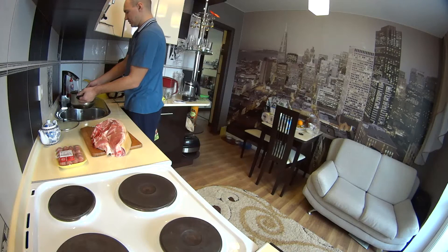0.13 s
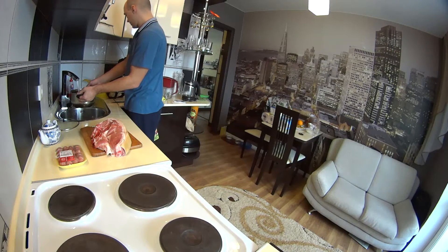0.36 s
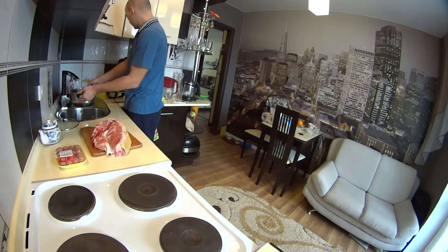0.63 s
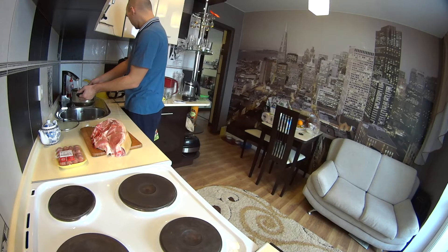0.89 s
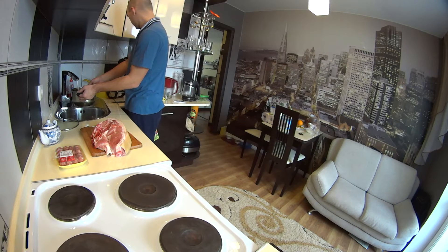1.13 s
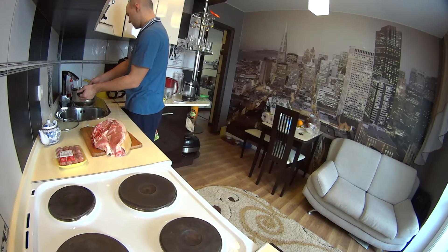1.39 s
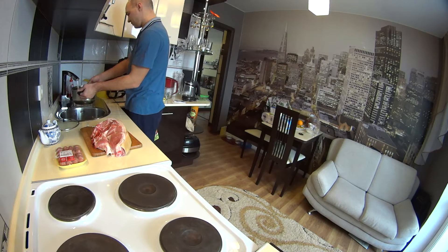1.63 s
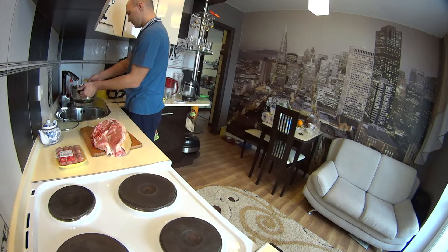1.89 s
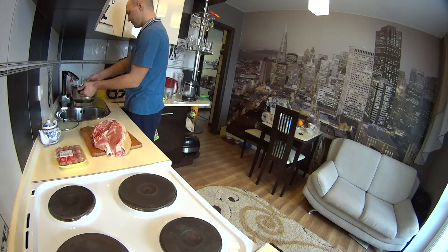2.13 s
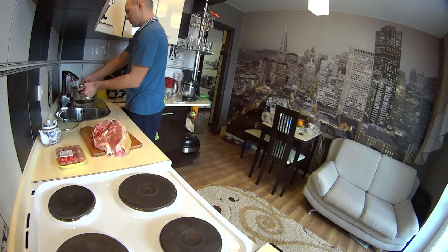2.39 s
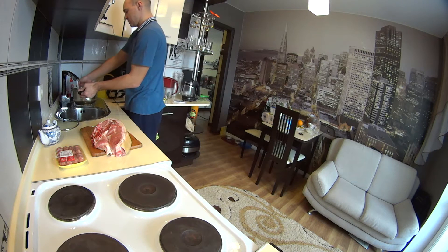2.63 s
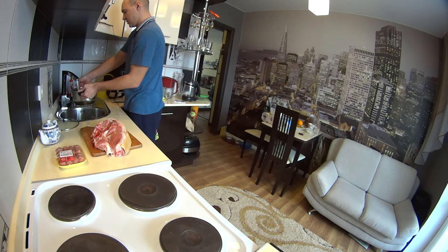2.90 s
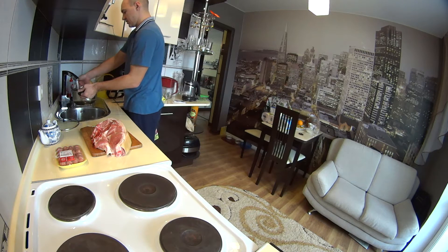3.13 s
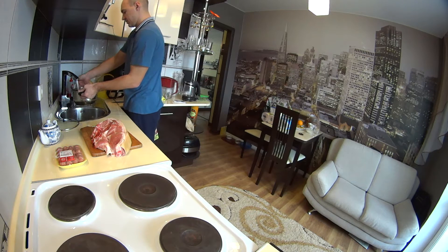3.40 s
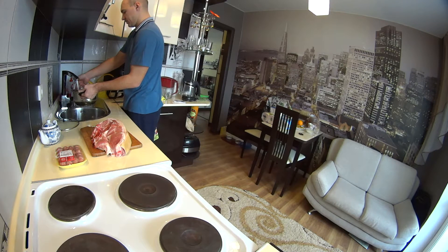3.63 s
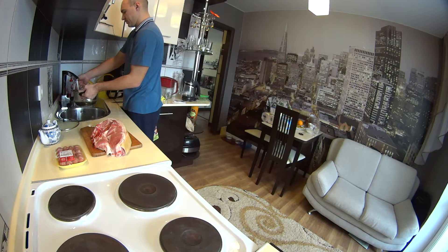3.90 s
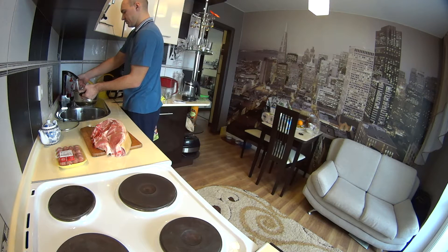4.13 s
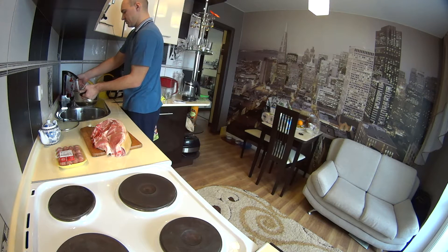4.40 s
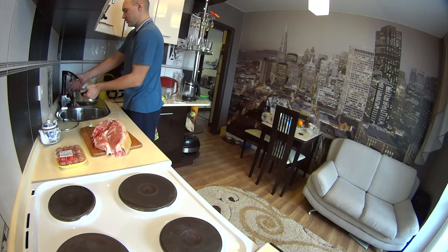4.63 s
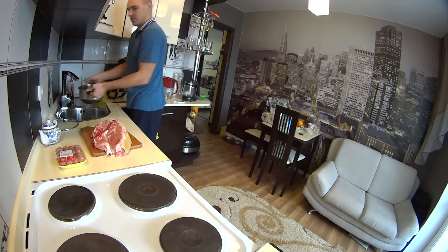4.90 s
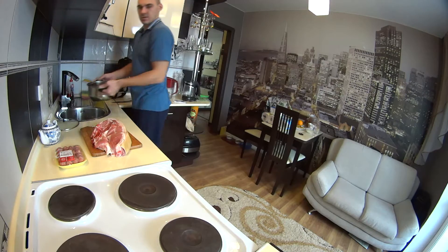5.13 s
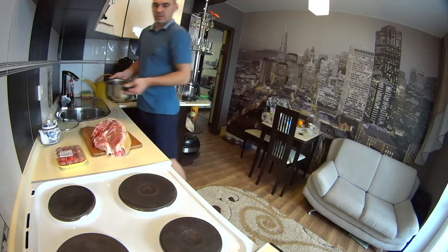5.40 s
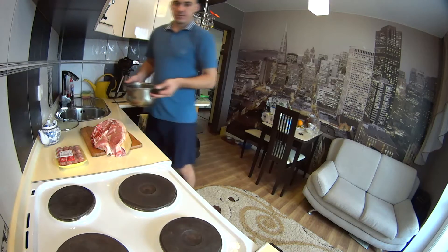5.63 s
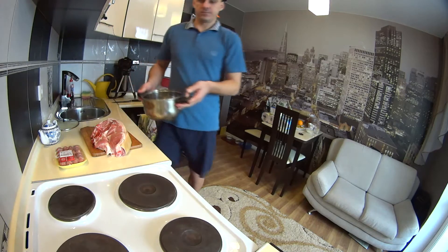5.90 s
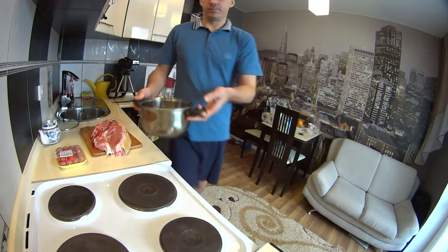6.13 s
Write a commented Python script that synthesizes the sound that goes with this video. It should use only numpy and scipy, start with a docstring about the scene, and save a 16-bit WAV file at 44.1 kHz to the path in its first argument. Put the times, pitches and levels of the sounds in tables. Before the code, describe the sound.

Loud water drumming into a metal pot, abruptly cut off with a dull knock, followed by trickles, ticking drips, faint footsteps and a tiny squeak.

```python
"""A hard jet of tap water fills a steel pot over the sink: random drop impacts make a hiss coloured by the air
left in the pot, and splashing drives resonances of its walls and bottom, which change as it fills.
The tap shuts with a water-hammer thud of damped pipe modes; the last water trickles as clumped, filtered grains
and drips as ticks with rising tones, then a swish, a rustle and a short squeak. Soft scuffs of gritty noise and
faint tones go with the carrying of the pot. Two close microphones a few metres away hear it in a furnished room."""
import sys
import numpy as np
from scipy import signal
from scipy.fft import rfft, irfft, next_fast_len
from scipy.io import wavfile

SR = 44100
rng = np.random.default_rng(int(sys.argv[2]) if len(sys.argv) > 2 else 0)


def unload_wav(signal):
    """Save mono or channel-first audio to the path in sys.argv[1] as 16-bit WAV at rate SR, clipped to [-1, 1]."""
    wavfile.write(
        sys.argv[1],
        SR,
        np.round(np.clip(np.atleast_2d(signal).T, -1, 1) * 32767).astype(np.int16),
    )


def decibels_to_gain(level_db):
    """Convert a level in decibels to a linear amplitude gain (20 dB per decade)."""
    exponent = np.asarray(level_db, float) / 20
    return 10 ** exponent


N = 276066   # length in samples


def rms_one(x):
    """Normalization: scale to an rms of 1."""
    return x / np.sqrt(np.mean(x ** 2) + 1e-20)


def in_time(rows):
    """Linear interpolation: columns of a table become per-sample curves."""
    s, *columns = np.transpose(rows)
    return [np.interp(np.arange(N) / SR, s, c) for c in columns]


def at_hz(points, hz):
    """Spectral interpolation: levels are read along a log-frequency axis."""
    table_hz, table_db = np.transpose(points)
    return np.interp(np.log(hz), np.log(table_hz), table_db)


def coloured(x, points):
    """Linear filtering: multiply the spectrum of a long sound by a gain curve."""
    size = next_fast_len(N)
    hz = np.maximum(np.arange(size // 2 + 1) * SR / size, 1)
    return irfft(rfft(x, size) * decibels_to_gain(at_hz(points, hz)), size)[:N]


def drift(rate):
    """Low-passed noise: a slow random curve of rms 1 that changes about rate times a second."""
    r = np.exp(-80 * np.pi * rate / SR)   # one step per 40 samples
    noise = rng.standard_normal(N // 40 + 2002)
    slow = signal.lfilter([1], [1, -2 * r, r * r], noise)[2000:]   # drop the filter's start
    return np.interp(np.arange(N) / 40, np.arange(len(slow)), rms_one(slow))


def resonance(x, hz, width_hz):
    """Driven resonator: a two-pole peak whose damping sets its width."""
    r = np.exp(-np.pi * width_hz / SR)
    return signal.lfilter([1, 0, -1], [1, -2 * r * np.cos(2 * np.pi * hz / SR), r * r], x)


def ring(clicks, hz, t60):
    """Impulse response of a damped mode: a unit click starts a dying sine of height 1."""
    r, w = decibels_to_gain(-60 / (max(t60, .0003) * SR)), 2 * np.pi * hz / SR
    return signal.lfilter([0, np.sin(w)], [1, -2 * r * np.cos(w), r * r], clicks + 1e-18)


def droplets(per_s, spread_db):
    """Random point process: impacts of uneven size and either sign, rms 1."""
    sizes = decibels_to_gain(spread_db * np.minimum(rng.exponential(1, N), 5)) * rng.choice([-1, 1], N)
    return rms_one(sizes * (rng.random(N) < per_s / SR))


def patchy(x, patchy_db):
    """Random band modulation: overlapping quarter-octaves swell and sink, partly together."""
    size = next_fast_len(N)
    spectrum, together, out = rfft(x, size), drift(8.0), 0
    hz = np.arange(1, size // 2 + 2) * SR / size
    step = np.maximum(4 * np.log2(hz / 100), 0)   # quarter-octaves above 100 Hz
    for k in range(31):
        # triangular bands add up flat
        band = irfft(spectrum * np.clip(1 - abs(step - k), 0, 1), size)[:N]
        out = out + band * decibels_to_gain(patchy_db * (0.51 * together + 1.26 * drift(2.75) + 0.24 * drift(26.0)))
    return out


def swells(s, db, rise_s, fall_s):
    """Envelope superposition: a sum of lopsided bell curves."""
    t = np.arange(N) / SR
    return sum(decibels_to_gain(d) * np.exp(-((t - at) / np.where(t < at, rise, fall)) ** 2)
               for at, d, rise, fall in np.broadcast(s, db, rise_s, fall_s))


def reflections(x, t60):
    """Diffuse reverberation: dense, exponentially dying echoes of unit energy."""
    t = np.arange(round(t60 * SR)) / SR
    tail = rng.standard_normal(len(t)) * decibels_to_gain(-60 * t / t60) * (t > .003)
    return signal.fftconvolve(x, tail / np.sqrt(np.sum(tail ** 2)))[:N]


def valve_closing_db():
    """Flow throttling: the valve closes ever faster, so the level falls with the cube of time."""
    closing_s, db_per_s3 = 4.43, 13000
    return -db_per_s3 * np.clip(np.arange(N) / SR - closing_s, 0, 1) ** 3


def spray_and_rumble(fill, running):
    """Cavity colouration: drop impacts hiss through the air space left in the pot, over churning water."""
    # Hiss spectra of the empty, half-full and full pot: [f/Hz, level/dB per Hz]
    hiss_empty = [(880, -29), (1500, -17), (2040, -23), (2420, -6.5), (2730, -5.5), (3070, -10.5),
                  (3430, -10), (3680, -6), (4270, -6), (5320, -3), (6960, -1), (9020, -7.5), (11600, -19.5),
                  (15100, -22), (16200, -44)]
    hiss_half = [(880, -52), (1500, -15.5), (1870, -15), (2020, -9.5), (2130, -13.5), (2620, -9),
                 (2900, -7), (3570, -3.5), (4270, -3.5), (5060, -1), (7030, 1.5), (8240, -2),
                 (12200, -18.5), (15100, -18.5), (16200, -40)]
    hiss_full = [(880, -67), (1500, -9), (1660, -13), (1790, -14.5), (2700, -9), (3070, -0.5), (3980, -2.5),
                 (5370, 1.5), (5990, 1.5), (8240, 1), (9760, -8), (10600, -10), (12300, -21), (15100, -14),
                 (16200, -46)]
    # Spectrum of the churning water: [f/Hz, level/dB per Hz]
    rumble_colour = [(24, -43), (40, -14), (168, -7.5), (254, 3.5), (312, -16), (396, -10.5), (563, -8),
                     (893, -6), (1350, -2.5), (1800, -17), (2340, -22.5), (3960, -120)]
    flow_db, rumble_db = -18.5, -39
    hiss = 0
    for k, colour in enumerate((hiss_empty, hiss_half, hiss_full)):
        spray = coloured(droplets(20000, spread_db=2.5), colour)
        spray = spray + decibels_to_gain(-9) * reflections(spray, .06)   # tiles and sink add fine ripples to the colour
        share = np.sqrt(np.clip(1 - abs(2 * fill - k), 0, 1))   # equal-power crossfade
        hiss = hiss + share * rms_one(spray)
    churn = rms_one(coloured(droplets(4000, spread_db=3.5), rumble_colour))
    rumble = decibels_to_gain(rumble_db + 0.77 * fill) * running * churn
    return patchy(decibels_to_gain(flow_db) * running * hiss + rumble, patchy_db=0.5)


def further_pot_modes(fill, running):
    """Forced vibration: noise shakes further pot modes, whose levels shift as the pot fills."""
    # Further pot modes, one low and the rest above the main ring:
    # [f/Hz, width/Hz, level when empty/dB, level when full/dB]
    pot_modes = [(814, 22, -48, -46.5), (1325, 11, -51.5, -45), (1430, 150, -45, -67),
                 (1674, 13, -53, -46.5), (1856, 20, -45, -49), (2160, 28, -45, -44),
                 (342.6, 18, -49.5, -52), (2390, 16, -43.5, -47), (2967, 58, -48, -46),
                 (3200, 59, -77, -45)]
    out = np.zeros(N)
    for hz, width_hz, empty_db, full_db in pot_modes:
        shaken = rms_one(resonance(rng.standard_normal(N), hz, width_hz))
        out += running * decibels_to_gain((1 - fill) * empty_db + fill * full_db + 1.7 * drift(6.2)) * shaken
    return out


def mode_flares(running):
    """Passing resonance: high wall modes flare while the water level suits them."""
    # Flares: [t of the peak/s, f/Hz, level/dB, half length/s]
    flares = [(.1, 7270, -30, 0.24), (.15, 8000, -30, .3), (.2, 6700, -38, 0.46), (0.48, 3720, -30.5, 0.36),
              (.7, 5230, -28, 0.52), (.8, 5730, -29, .45), (1.248, 7050, -36, 0.32), (2.1, 7070, -29, .4),
              (2.398, 6680, -28.5, 0.27), (3.2, 8300, -32.5, 1.1), (3.3, 5290, -32.5, 0.99),
              (3.9, 7120, -32, 0.43), (1.5, 10750, -45, 2.4)]
    out = np.zeros(N)
    for at, hz, db, half_s in flares:
        mode = rms_one(resonance(rng.standard_normal(N), hz, width_hz=81))
        out += running * swells(at, db, half_s, half_s) * mode
    return out


def slapped_steel(running):
    """Impact excitation: lumps of the stream slap the main modes; water load raises hum and damps ring."""
    # Modes of pot bottom and sink: [f/Hz, width/Hz, level/dB]
    hum_modes = [(265.8, 6.4, 1), (255.3, 6.5, -4), (196.7, 7, -11), (143, 13, -11.5)]
    # Wall modes of the main ring: [f/Hz, width/Hz, level/dB]
    ring_modes = [(588, 28.6, 4), (550, 27, -1), (515.5, 11, -10), (635, 35, 0), (662, 150, -7)]
    # Heavy lumps hitting the steel: [t/s, hum level/dB, ring level/dB, length/s]
    lumps = [(0.22, -45, -48, 0.081), (0.431, -40, -31.5, 0.023), (1.135, -55, -39, 0.048),
             (1.373, -45, -48, 0.054), (1.744, -36, -61, 0.036), (2.555, -39, -37, .09),
             (2.79, -44, -36, .04), (2.895, -34.5, -59, 0.033), (3.022, -41, -34.5, .05),
             (3.195, -40, -46, 0.11), (3.512, -35, -42, 0.051), (3.683, -43.5, -42, 0.062),
             (3.82, -32.5, -59, 0.051), (4.133, -43, -74, 0.2), (4.476, -45, -45, 0.064)]
    rise_share = 0.27   # part of a lump's length
    t = np.arange(N) / SR
    s, hum_slap_db, ring_slap_db, length_s = np.transpose(lumps)
    undamped = np.exp(-(t / 1.7) ** 2)
    hum_db = -49.5 + 0.5 * t
    ring_db = undamped * -35 + (1 - undamped) * -44.5
    out = np.zeros(N)
    for modes, steady_db, slap_db in ((hum_modes, hum_db, hum_slap_db), (ring_modes, ring_db, ring_slap_db)):
        slaps = droplets(3000, spread_db=2.0)
        body = 0
        for hz, width_hz, db in modes:
            mode = resonance(resonance(slaps, hz, 3 * width_hz), hz, width_hz)
            body = body + decibels_to_gain(db) * rms_one(mode)
        lump_level = swells(s, slap_db, rise_share * length_s, (1 - rise_share) * length_s)
        out += (running * decibels_to_gain(steady_db) + lump_level) * rms_one(body)
    return out


def jet():
    """Superposition: spray, rumble and steel modes stop together as the tap shuts."""
    # How full the pot sounds: [t/s, fill 0-1]
    fill_curve = [(0, 0), (1.1, .08), (1.6, .5), (2.5, .55), (2.8, 1), (4.62, 1)]
    shut_s, shut_fade_s = 4.62, .056
    fill, = in_time(fill_curve)
    running = decibels_to_gain(valve_closing_db())
    out = spray_and_rumble(fill, running) + further_pot_modes(fill, running)
    out += mode_flares(running) + slapped_steel(running)
    return out * np.clip((shut_s - np.arange(N) / SR) / shut_fade_s, 0, 1)


def room_noise():
    """Stationary random noise: a steady coloured background."""
    # Spectrum of the background: [f/Hz, level/dB per Hz]
    floor_colour = [(15, -36), (25, -13), (53, 2.5), (97, -6), (149, 0.5), (294, -5.5), (396, -1.5),
                    (466, -0.5), (781, -9), (944, -8), (2070, -17), (6820, -14.5), (11700, -23.5),
                    (15000, -23), (16200, -32)]
    return decibels_to_gain(-46) * rms_one(coloured(rng.standard_normal(N), floor_colour))


def run_off():
    """Modulated noise: a thinning trickle, splashes, a swish, a rustle and a wavering drain whistle."""
    # Spectrum of the trickle: [f/Hz, level/dB per Hz]
    trickle_colour = [(120, -26), (200, -4), (569, -3.5), (735, -4.5), (821, -7), (2210, -10.5), (3130, -9),
                      (4770, -6.5), (7970, -9), (16000, -41)]
    # Splashes into the sink; the last two are a soft swish and a rustle: [t/s, level/dB, length/s]
    bursts = [(4.613, -56, 0.032), (4.655, -58, 0.017), (4.806, -41.5, 0.11), (4.88, -47, 0.09),
              (4.957, -39.5, 0.13), (5.106, -47, 0.098), (5.212, -47.5, 0.054), (5.273, -51, 0.055),
              (5.96, -52, 0.21), (6.115, -55, .065)]
    # Course of the drain whistle: [t/s, level/dB]
    whistle_course = [(4.5, -50), (4.62, -64), (5.0, -63), (5.08, -52), (5.25, -55), (5.47, -54),
                      (5.58, -66), (5.75, -75)]
    start_s, fade_in_s, burst_rise_share = 4.5, 0.041, 0.17
    t = np.arange(N) / SR
    since = t - start_s
    s, db, length_s = np.transpose(bursts)
    gush = decibels_to_gain(-28.5 - 114 * abs(since))   # the water left in the spout falls first
    steady = decibels_to_gain(-38.5 - 24 * abs(since))
    burst = swells(s, db, burst_rise_share * length_s, (1 - burst_rise_share) * length_s)
    grains = droplets(9000, spread_db=2.0) * decibels_to_gain(1.5 * drift(60.0))   # grains come in clumps
    trickle = patchy(rms_one(coloured(grains, trickle_colour)), patchy_db=-1.0)
    whistle_db, = in_time(whistle_course)
    whistle = rms_one(resonance(resonance(rng.standard_normal(N), 3260, 400), 3280, 220))
    whistle = np.interp(t + .0002 * drift(6.0), t, whistle)   # a time wobble in s bends the pitch
    out = (gush + steady + burst) * trickle + decibels_to_gain(whistle_db) * whistle
    return np.clip(since / fade_in_s, 0, 1) * out


def water_hammer():
    """Water hammer: the stopped column rebounds, each knock a soft blow that rings the pipe modes."""
    # Knocks: [t/s, blow level/dB, contact/ms]
    knocks = [(4.53, -31, 8), (4.548, -16.5, 2), (4.559, -20, 7), (4.5695, -21, 7), (4.6195, -26, 6),
              (4.643, -29, 6), (4.684, -25, 7), (4.744, -30, 6), (4.769, -30, 5), (4.857, -31, 4),
              (4.953, -32, 5), (5.048, -35, 6)]
    # Pipe modes: [f/Hz, level/dB, t60/s]
    pipes = [(85, 0, .15), (62, -13, .1), (38, -4, .09), (102, -6, .1), (148, -9, .1), (268, -4, .07),
             (325, -7, .06), (388, -11, .09), (600, -13, .04)]
    shudder_db, shudder_t60_s = -58, 1.3   # the loose pipes keep rattling on their clips
    since = np.arange(N) / SR - knocks[1][0]   # from the second knock
    dying = decibels_to_gain(shudder_db - 60 * np.maximum(since, 0) / shudder_t60_s) * (since > 0)
    rattle = dying * droplets(120, spread_db=0.0)
    contact = np.hanning(round(.003 * SR))
    blows = np.convolve(rattle, contact / contact.sum())[:N]
    for s, db, contact_ms in knocks:
        contact = np.hanning(round(max(contact_ms, 1) * SR / 1000))
        blows[round(s * SR):][:len(contact)] += decibels_to_gain(db) * contact / contact.sum()
    rings = sum(decibels_to_gain(db) * ring(blows, hz, t60) for hz, db, t60 in pipes)
    # the deepest part is not radiated
    return signal.sosfilt(signal.butter(2, 26, "high", fs=SR, output="sos"), rings)


def drips_and_squeak():
    """Damped chirps: each drip, and each part of a late squeak, is a tick, a rising tone and a spatter."""
    # Drips; the last three rows make one short squeak rising in pitch:
    # [t/s, tick level/dB, f/Hz, tone level/dB]
    chirps = [(4.6845, -37, 2160, -32.5), (4.7977, -21, 4400, -44), (4.834, -24, 3330, -40),
              (4.878, -27, 1500, -60), (4.9488, -30, 6750, -33), (4.9506, -43, 1820, -30),
              (4.962, -34, 7200, -32), (4.973, -28, 4500, -32), (5.0830, -42, 3240, -33),
              (5.105, -38, 7500, -39), (5.132, -21, 9600, -35), (5.178, -32, 9140, -33),
              (5.208, -27, 4860, -47), (5.2726, -35, 7920, -22.5), (5.281, -34, 3970, -37),
              (5.3242, -27, 7940, -41), (5.328, -38, 7440, -31), (5.362, -31, 6100, -40),
              (5.5437, -34, 8350, -36), (6.112, -55, 4830, -44), (6.138, -52, 4910, -40),
              (6.165, -50, 5020, -50)]
    tick_t60_s, spatter_t60_s = .0014, 0.07
    pitch_rise, tone_cycles = .0012, 170   # share of pitch gained each cycle; cycles until 60 dB down
    spatter_db = -9   # against the tone
    out, t, spray = np.zeros(N), np.arange(N) / SR, droplets(3000, spread_db=-2.0)
    for s, tick_db, hz, tone_db in chirps:
        click = np.zeros(N)
        click[round(s * SR)] = 1
        tick = ring(ring(click, hz, tick_t60_s), 0.94 * hz, tick_t60_s)   # band-limited
        spatter = rms_one(resonance(spray, hz, width_hz=410 * hz / 8000))
        spatter = spatter * (t > s) * decibels_to_gain(-60 * abs(t - s) / spatter_t60_s)
        cycles = hz * np.maximum(t - s, 0)
        phase = 2 * np.pi * cycles * (1 + pitch_rise * np.minimum(cycles, 300) / 2)
        tone = decibels_to_gain(-60 * cycles / tone_cycles) * np.sin(phase)   # in a drip, a tiny bubble
        out += decibels_to_gain(tick_db) * tick / abs(tick).max()
        out += decibels_to_gain(tone_db) * (tone + decibels_to_gain(spatter_db) * spatter)
    return out


def scuffs():
    """Friction noise and impact: soles brush the floor in a gritty swell; heels thump its damped modes."""
    # Scuffs: [t/s, brush level/dB, heel level/dB]
    steps = [(5.635, -38.5, -53), (5.70, -46.5, -58), (6.17, -45.5, -35.5)]
    # Spectrum of the brushing: [f/Hz, level/dB per Hz]
    grit_colour = [(59, -55), (100, -22), (325, 2), (532, -14), (576, 1), (715, -3.5), (1700, -6),
                   (2470, -10), (4200, -11), (5300, -6), (11000, -22), (14300, -52), (22000, -120)]
    s, db, heel_db = np.transpose(steps)
    heels = np.zeros(N)
    heels[((s + .01) * SR).astype(int)] = decibels_to_gain(heel_db)   # 10 ms after the peak of the brush
    grit = rms_one(coloured(droplets(1800, spread_db=2.5), grit_colour))
    thump = ring(heels, 103, 0.11) + .5 * ring(heels, 300, 0.059)
    thump = thump + .4 * ring(heels, 560, 0.04) + .3 * ring(heels, 1500, 0.01)
    return swells(s, db, rise_s=0.032, fall_s=0.029) * grit + thump


def carrying_tones():
    """Narrow-band noise: two soft tones, one sagging and recovering in pitch, over a faint low drone."""
    t = np.arange(N) / SR
    steady, sagging, drone = (rms_one(resonance(resonance(rng.standard_normal(N), hz, 90), hz, 35))
                              for hz in (965, 965, 398))
    # a growing delay lowers the pitch, by a share of .12 at most
    lag_s = np.cumsum(.12 * swells(5.95, 0, .09, .09)) / SR
    pair = steady + np.interp(t - lag_s, t, sagging)
    moan = swells(5.89, -55.5, rise_s=.08, fall_s=.2) * pair
    return moan + swells(5.95, -55, rise_s=.25, fall_s=.25) * drone


def two_microphones(mid):
    """Mid-side stereo: opposite-sign reflected sound and a slight level bias set the channels apart."""
    # Side level against mid: [f/Hz, level/dB]
    side_level = [(40, -30), (90, -24), (160, -15), (270, -13), (450, -19), (700, -5.5), (1220, -9),
                  (2010, -12), (3000, -14.5), (4400, -17), (7000, -25), (8500, -24), (10000, -12),
                  (11500, -14), (15000, -18)]
    # Left level against right: [f/Hz, level/dB]
    left_bias = [(60, 0.0), (130, -0.5), (290, 0.5), (640, 2.0), (1410, 0.5), (3100, 0.0), (6820, 0.0),
                 (15000, 0.5)]
    side = coloured(reflections(mid, t60=0.15), side_level)
    left_gain = [(hz, db / 2) for hz, db in left_bias]
    right_gain = [(hz, -db) for hz, db in left_gain]
    return np.array([coloured(mid + side, left_gain), coloured(mid - side, right_gain)])


def scene():
    """Linear superposition: all sources add, with a reverberant tail on drips, squeak and steps."""
    hits = drips_and_squeak() + scuffs()
    tail = decibels_to_gain(-11) * reflections(hits, t60=.25)
    mid = jet() + room_noise() + run_off() + water_hammer() + hits + tail + carrying_tones()
    return two_microphones(mid)


def top_cut(x):
    """Nothing passes above the cut-off."""
    return signal.sosfilt(signal.butter(12, 16150, fs=SR, output="sos"), x)


def record(dry):
    """Uncorrelated self-noise: each microphone adds its own hiss."""
    # Spectrum of the microphone hiss: [f/Hz, level/dB per Hz]
    mic_colour = [(500, -26), (1000, -4), (3000, -4.5), (6500, -12), (10000, -13), (16000, -10.5)]
    hiss = [rms_one(coloured(rng.standard_normal(N), mic_colour)) for channel in dry]
    mix = dry + decibels_to_gain(-51.5) * np.array(hiss)
    return top_cut(mix)


dry = scene()
out = record(dry)
unload_wav(out)
```